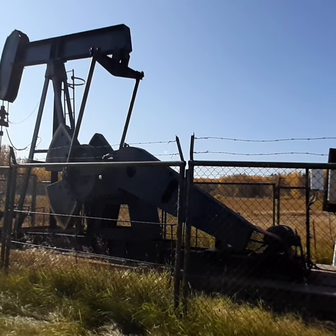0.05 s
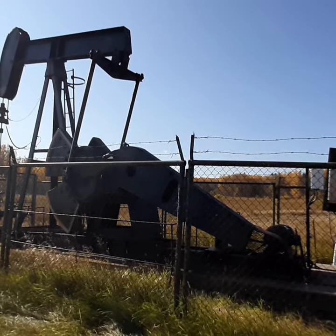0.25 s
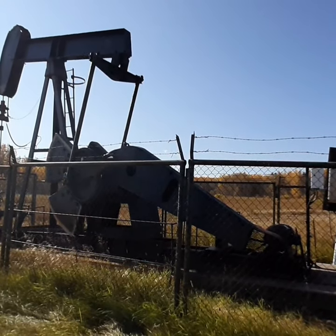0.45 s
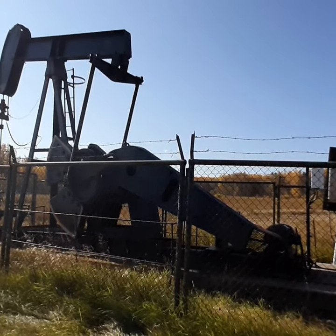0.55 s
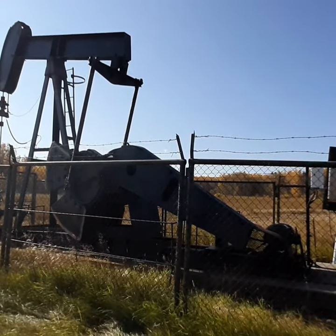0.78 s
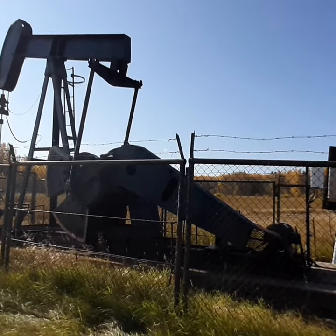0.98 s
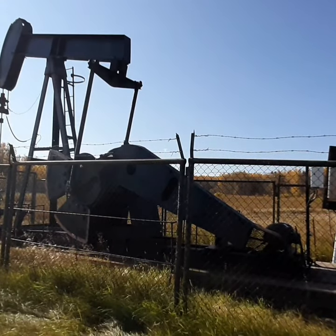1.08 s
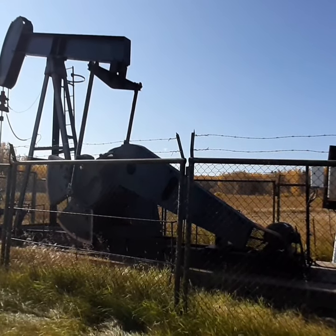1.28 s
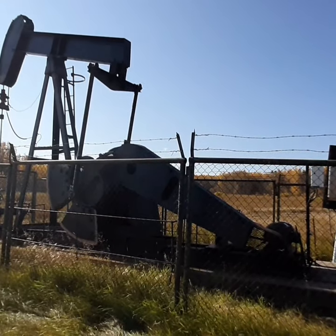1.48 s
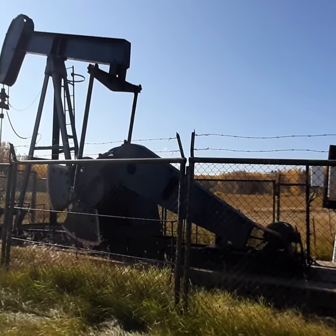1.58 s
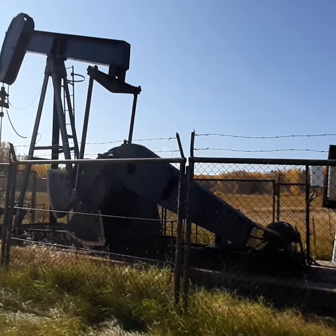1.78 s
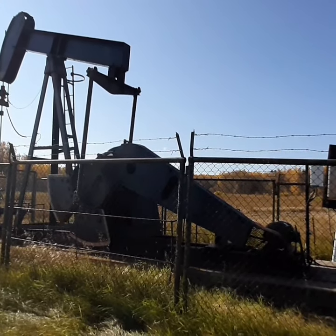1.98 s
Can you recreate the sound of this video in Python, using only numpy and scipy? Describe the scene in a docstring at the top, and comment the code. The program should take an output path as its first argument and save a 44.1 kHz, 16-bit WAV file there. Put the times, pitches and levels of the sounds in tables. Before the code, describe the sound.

An oil pump hums and whines steadily to the right in an open field, its belt faintly swishing. Wind buffets the microphone hard on the right, then lightly on the left. A few faint dry rustles follow close by.

```python
"""An oil pumpjack runs in an open field, off to the right of a stereo microphone. Its electric drive hums
and whines, wavering once per shaft turn, and the belt's uneven spot swishes over the pulley on every lap.
Wind buffets the two microphone ports, first hard on the right, then lightly on the left.
A few dry rustles sound close by, over an airy hiss."""
import sys
import numpy as np
from scipy import signal
from scipy.fft import rfft, irfft
from scipy.io import wavfile
from scipy.ndimage import uniform_filter1d

SR = 44100
rng = np.random.default_rng(int(sys.argv[2]) if len(sys.argv) > 2 else 0)


def generate_wav(sig):
    """Save sig (samples, or channels by samples) to the path in sys.argv[1] as 16-bit PCM at SR."""
    pcm = np.round(np.clip(np.atleast_2d(sig).T, -1, 1) * 32767).astype(np.int16)
    wavfile.write(sys.argv[1], SR, pcm)


N = 90404
T = np.arange(N) / SR
HZ = np.maximum(np.arange(N // 2 + 1) * SR / N, 1)

# Resonances of the motor housing and guard. Each row: pitch in Hz, width in Hz, relative level in dB.
HOUSING_MODES = [(509, 7.4, -62.5), (614.5, 8.1, -60.5), (880, 14.3, -58), (1112, 16, -57),
                 (1599, 12.8, -64.5), (1866, 57, -61.5), (2040, 13, -68), (2131, 5.5, -72)]


def from_db(db):
    """Decibels to gain."""
    return 10 ** (np.asarray(db) / 20)


def rms_one(x):
    """Scale to unit power."""
    return x / np.sqrt(np.mean(x ** 2) + 1e-20)


def steady(x):
    """Hold the power near one over a sliding 35 ms."""
    return x / np.sqrt(uniform_filter1d(x ** 2, int(0.0346 * SR)) + 1e-6)


def in_time(rows):
    """Join (seconds, value) points by lines."""
    return np.interp(T, *np.transpose(rows))


def at_hz(points):
    """Join (Hz, value) points on a log axis."""
    hz, value = np.transpose(points)
    return np.interp(np.log(HZ), np.log(hz), value)


def noise(gain):
    """Unit noise shaped by a gain at each frequency."""
    return rms_one(irfft(gain * np.exp(2j * np.pi * rng.random(len(HZ))), N))


def drift(rate_hz):
    """Random wander of spread 1, mostly slower than the rate."""
    return noise(1 / (1 + (HZ / rate_hz) ** 2))


def resonance(hz, width_hz):
    """Unit-power gain curve of one resonance."""
    return rms_one(1 / (1 + ((HZ - hz) / width_hz) ** 2))


def tone(pitch_hz):
    """A sine that follows a moving pitch."""
    return np.sin(2 * np.pi * np.cumsum(pitch_hz) / SR)


def stroke(start, attack_s, decay_s):
    """Linear rise, exponential fall."""
    return np.clip((T - start) / attack_s, 0, 1) * np.exp(-np.maximum(T - start - attack_s, 0) / decay_s)


def swell(peak_s, width_s):
    """Bell-shaped rise and fall around a moment."""
    return np.exp(-((T - peak_s) / width_s) ** 2)


def from_right(pair):
    """Place a sound to the right: it reaches the left port later."""
    # Each row: frequency in Hz, phase lag of the left port in radians.
    left_lag = [(200, -1), (850, 0.11), (1500, 1), (2000, 0.3), (2800, 1.17), (3300, 4), (4300, 3.5),
                (6900, 5), (9300, 7)]
    return np.array([irfft(rfft(pair[0]) * np.exp(-1j * at_hz(left_lag)), N), pair[1]])


def field_noise(gain):
    """Unit stereo noise from the right, partly alike at the two ports."""
    # Each row: frequency in Hz, likeness of the channels from 0 to 1.
    likeness = [(150, 0.3), (380, 1), (850, 0.88), (1300, 0.93), (1900, 0.79), (3000, 0.59), (3900, 0.44),
                (5800, 0.28), (7000, 0.75), (9000, 0)]
    alike = np.clip(at_hz(likeness), 0, .99)
    mid, side = np.exp(2j * np.pi * rng.random((2, len(HZ))))
    spectra = np.sqrt(1 + alike) * mid + np.sqrt(1 - alike) * side * [[1], [-1]]
    return from_right(rms_one(irfft(gain * spectra, N)))


def hiss():
    """Airy hiss, stronger and further right during the first gust; its top stays steadier."""
    # Colour of the hiss. Each row: frequency in Hz, relative level in dB.
    spectrum = [(1500, -0.5), (2700, 0), (3350, 6), (4100, 7), (4500, -0.5), (5900, -3), (6800, 0.5),
                (7600, -0.5), (8500, -17), (10500, -10), (14000, -9.5), (15600, -0.5)]
    # Its course. Each row: time in seconds, relative level in dB, left minus right in dB.
    course = [(0, -49.5, -2), (.45, -49.5, -3), (.62, -54, -2), (.8, -55, -1), (2.05, -54, -1)]
    split_hz, top_db, top_follows = 6160, -54.5, 0.36
    times, db, pan_db = np.transpose(course)
    level_db = np.interp(T, times, db)
    balance_db = np.interp(T, times, pan_db) * [[1], [-1]] / 2
    colour = from_db(at_hz(spectrum))
    lower = 1 / (1 + (HZ / split_hz) ** 10)
    body_share = np.sum(colour ** 2 * lower) / np.sum(colour ** 2)
    body = from_db(level_db + balance_db) * field_noise(colour * np.sqrt(lower))
    top_gain = from_db(top_db + top_follows * (level_db - level_db.mean()))
    top = top_gain * field_noise(colour * np.sqrt(1 - lower))
    return np.sqrt(body_share) * body + np.sqrt(1 - body_share) * top


def rustles():
    """Short, dry, grainy brushes close to the microphone."""
    # Each row: start in seconds, level in dB, decay in seconds.
    brushes = [(1.368, -48, 0.036), (1.518, -49, 0.037), (1.622, -56, .025), (1.867, -50.5, 0.048)]
    # Their colour. Each row: frequency in Hz, relative level in dB.
    spectrum = [(2000, 6), (4500, -6), (6200, -1), (7400, 1), (8500, -5), (10000, -2.5), (15500, -2.5)]
    level = sum(from_db(db) * stroke(start, 0.0075, decay) for start, db, decay in brushes)
    return level * rms_one(field_noise(from_db(at_hz(spectrum))) * from_db(1.5 * drift(300)))


def squeaks():
    """A thin, rough tone slides upward as one rustle starts."""
    # Each row: start in seconds, level in dB, first pitch in Hz, rise in Hz, decay in seconds.
    slides = [(1.517, -56.5, 6790, 915, 0.027)]
    glide_s, jitter_hz = 0.035, 111
    out = 0
    for start, db, hz, rise_hz, decay in slides:
        glide = 1 - np.exp(-np.maximum(T - start, 0) / glide_s)
        pitch = hz + rise_hz * glide + jitter_hz * drift(370)
        out = out + from_db(db) * stroke(start, .005, decay) * rms_one(tone(pitch))
    return from_right([out, out])


def port_wind(flow):
    """Wind on one port: rumble that follows the flow, with small eddies coming in lumps on top."""
    # Colour of the wind. Each row: frequency in Hz, relative level in dB.
    spectrum = [(24, -49), (35, -12.5), (55, -0.5), (80, 1.5), (125, -1.5), (180, -6.5), (280, -15),
                (420, -27), (700, -26.5), (1200, -41.5), (2000, -47), (3000, -99)]
    split_hz, eddy_trim_db, lump_db = 290, -0.5, 4.5
    colour = from_db(at_hz(spectrum))
    upper = 1 / (1 + (split_hz / HZ) ** 4)
    eddy_share = np.sqrt(np.sum(colour ** 2 * upper) / np.sum(colour ** 2))
    rumble = steady(noise(colour * np.sqrt(1 - upper)))
    eddies = rms_one(noise(colour * np.sqrt(upper)) * from_db(lump_db * np.clip(drift(54), -2, 2)))
    return from_db(in_time(flow)) * (rumble + from_db(eddy_trim_db) * eddy_share * eddies)


def flutter():
    """Light, lumpy flutter of air across one port, strongest in the lighter gust."""
    # Each row: time in seconds, relative level in dB.
    course = [(.7, -46), (.79, -44.5), (.82, -40), (.91, -36.5), (.97, -48), (1.02, -40.5), (1.06, -67),
              (1.11, -47), (1.2, -47)]
    # Its low-middle colour. Each row: frequency in Hz, relative level in dB.
    spectrum = [(150, -19), (300, 0), (420, 1), (700, -12), (3000, -57)]
    air = noise(from_db(at_hz(spectrum)))
    lumps = from_db(6 * drift(44))
    return from_db(in_time(course)) * rms_one(air * lumps)


def puffs():
    """Soft, hollow puffs of air across a port."""
    # Each row: peak time in seconds, level in dB, half-width in seconds.
    swells = [(0.704, -38, 0.13), (0.917, -31.5, 0.029), (1.105, -29.5, 0.022), (1.45, -40, 0.0061)]
    level = sum(from_db(db) * swell(peak, width) for peak, db, width in swells)
    return level * noise(resonance(hz=205.5, width_hz=43))


def heave():
    """Deep, even rumble under the first gust."""
    # Each row: time in seconds, level in dB.
    course = [(0, -43), (.27, -36), (.62, -25), (.67, -75)]
    return from_db(in_time(course)) * steady(noise(resonance(hz=49.7, width_hz=15)))


def wind():
    """Gusts on the microphone: a hard one on the right, then a lighter one on the left."""
    # The flow at each port. Each row: time in seconds, level in dB.
    left_flow = [(0, -40), (.18, -40), (.32, -35), (.4, -26.5), (.48, -36.5), (.55, -30), (.75, -34.5),
                 (.92, -26.5), (.99, -36), (1.1, -34), (1.17, -38.5), (1.28, -34.5), (1.44, -46),
                 (1.51, -36), (1.68, -43.5), (1.75, -35), (1.82, -43), (2.05, -45)]
    right_flow = [(0, -38.5), (.08, -27.5), (.18, -36.5), (.22, -25), (.3, -31), (.39, -31.5), (.43, -28),
                  (.465, -21), (.49, -12), (.535, -10.5), (.595, -23.5), (.632, -21), (.652, -45.5),
                  (.87, -68), (.92, -32.5), (1.04, -81), (1.11, -33), (1.2, -75), (1.38, -42),
                  (1.53, -46.5), (1.62, -70), (2.05, -55)]
    left = port_wind(left_flow) + from_db(-8) * flutter() + puffs()
    right = port_wind(right_flow) + flutter() + heave()
    return np.array([left, right])


def thumps():
    """Single eddies hit a port as rounded pressure spikes, duller when wider; the port swings back."""
    # Each row: time in seconds, relative level in dB, width in ms, port (0 left, 1 right).
    eddies = [(0.206, -15, 0.41, 1), (0.2179, -3.5, 0.61, 1), (0.269, -9, 1.5, 1), (.326, -8, 1.4, 1),
              (0.3842, -5, 0.3, 1), (0.435, -13.5, 0.33, 1), (.481, -10, 0.35, 1), (.5205, -7.5, 0.24, 1),
              (0.5297, -5.5, 0.34, 1), (.552, -6, 0.34, 1), (.566, 0.5, 0.7, 1), (.575, -8.5, 0.28, 1),
              (0.6127, 0.5, 0.57, 1), (.618, -7.5, 0.26, 1), (.634, -5, 0.74, 1), (.821, -25, 0.19, 1),
              (.858, -19.5, 0.19, 1), (.92, -13, 1, 0), (.943, -23, 0.77, 0), (1.019, -21.5, .17, 1),
              (1.39, -17, 1.9, 1), (1.515, -20.5, .9, 1), (1.733, -20, 1.7, 0)]
    pressure = np.zeros((2, N))
    for peak_s, db, width_ms, port in eddies:
        falloff = np.exp(-np.abs(T - peak_s) * 1000 / width_ms)
        spike = 2 * falloff / (1 + falloff ** 2)
        pressure[int(port)] += rng.choice([-1, 1]) * from_db(db) * spike
    port_low_cut = signal.butter(2, 90, "high", fs=SR, output="sos")
    return signal.sosfilt(port_low_cut, pressure + 1e-18)


def belt():
    """The belt's uneven spot rubs over the pulley in two strokes a lap, the first with a dull chirp."""
    # Colour of the swish. Each row: frequency in Hz, relative level in dB.
    spectrum = [(4000, -26), (7500, 9), (8600, -15), (11000, -1), (15500, 4.5)]
    # Level of the chirp in dB, lap by lap.
    chirp_db = [-51, -51, -54.5, -56.5, -61, -62, -54]
    # The chirp's resonances. Each row: pitch in Hz, width in Hz, relative level in dB.
    chirp_modes = [(2570, 144, -5), (3920, 200, -5)]
    first_s, lap_s, gap_s = 0.0935, .2965, 0.028
    attack_s, decay_s, swish_db = 0.013, 0.012, -56
    laps = first_s + lap_s * np.arange(len(chirp_db))
    first_rub = sum(stroke(lap, attack_s, decay_s) for lap in laps)
    second_rub = from_db(-1) * sum(stroke(lap + gap_s, attack_s, decay_s) for lap in laps)
    chirp_level = sum(from_db(db) * swell(lap + 0.012, width_s=0.014) for lap, db in zip(laps, chirp_db))
    squeal = field_noise(sum(from_db(db) * resonance(hz, width) for hz, width, db in chirp_modes))
    swish = from_db(swish_db) * (first_rub + second_rub) * field_noise(from_db(at_hz(spectrum)))
    return swish + chirp_level * squeal


def housing():
    """Each housing resonance is driven without pause: narrow ringing noise around a wavering tone."""
    noise_share, waver_db = 0.76, 1.5
    tones, power = 0, 0
    for hz, width, db in HOUSING_MODES:
        pitch = hz + width * drift(width) / 2
        waver = from_db(waver_db * drift(6.6))
        tones = tones + from_db(db) * rms_one(waver * tone(pitch))
        power = power + (from_db(db) * resonance(hz, width)) ** 2
    ringing = np.sqrt(noise_share * power.mean()) * field_noise(np.sqrt(power))
    return np.sqrt(1 - noise_share) * from_right([tones, tones]) + ringing


def ring():
    """The second housing resonance rings out for a moment."""
    hz = HOUSING_MODES[1][0]
    return from_db(-46) * swell(peak_s=1.373, width_s=0.033) * np.sin(2 * np.pi * hz * T)


def motor_whine():
    """A fluttering whine whose pitch swings once per shaft turn."""
    shaft_hz, whine_hz, swing_hz, wander_hz = 19.6, 910, 15.8, 2.67
    pitch = whine_hz + swing_hz * np.sin(2 * np.pi * shaft_hz * T) + wander_hz * drift(3.34)
    whine = from_db(-53.5) * rms_one(tone(pitch) * (1 + 0.32 * drift(60)))
    return from_right([whine, whine])


def drive():
    """The pumpjack's electric drive: a steady rush, the ringing housing and the whine."""
    # Colour of the rush. Each row: frequency in Hz, relative level in dB.
    spectrum = [(120, -13.5), (220, -8), (320, -6.5), (480, -6), (700, -7), (860, 3), (1000, -3),
                (1120, -3.5), (1200, -12.5), (1560, -9.5), (1730, -15.5), (2150, -17), (2350, -35.5),
                (3200, -42)]
    # Heard level of the drive: the recorder turns it down after the hard gust, then it recovers.
    # Each row: time in seconds, gain in dB.
    heard_level = [(0, 3), (.2, 1.5), (.38, 3.5), (.55, -.5), (.7, -4.5), (.85, -1), (1.1, -1.5),
                   (1.36, -0.7), (1.48, -2.5), (1.72, -2), (2.05, -0.5)]
    # Whine and housing tones against the rush. Each row: time in seconds, gain in dB.
    tone_level = [(0, 1.5), (.15, 0.5), (1.8, 0), (2, 4.5)]
    whine = motor_whine()
    colour = from_db(at_hz(spectrum)) / (1 + (HZ / 4000) ** 10)
    rush = from_db(-46 + 0.37 * drift(43)) * field_noise(colour)
    tones = from_db(in_time(tone_level)) * (housing() + whine)
    return from_db(in_time(heard_level)) * (rush + tones + ring())


def scene():
    """The pumpjack in the open field, with wind on the microphone and rustles nearby."""
    return wind() + drive() + hiss() + belt() + rustles() + squeaks() + thumps()


def record(dry):
    """The top is cut steeply above 15.75 kHz."""
    return signal.sosfilt(signal.ellip(12, .1, 80, 15750, fs=SR, output="sos"), dry)


dry = scene()
out = record(dry)
generate_wav(out)
```